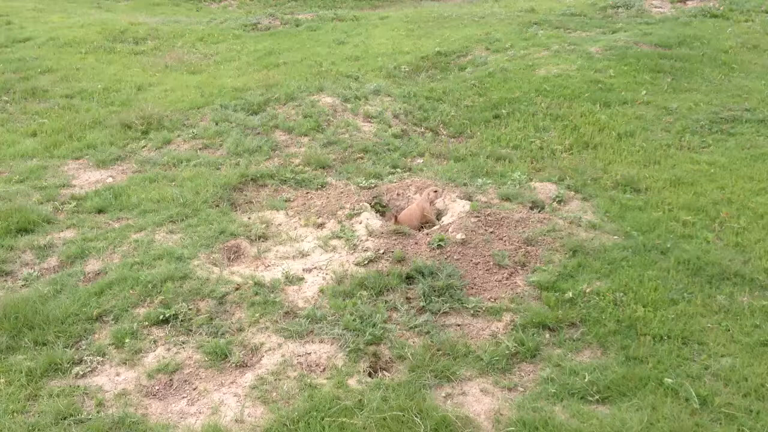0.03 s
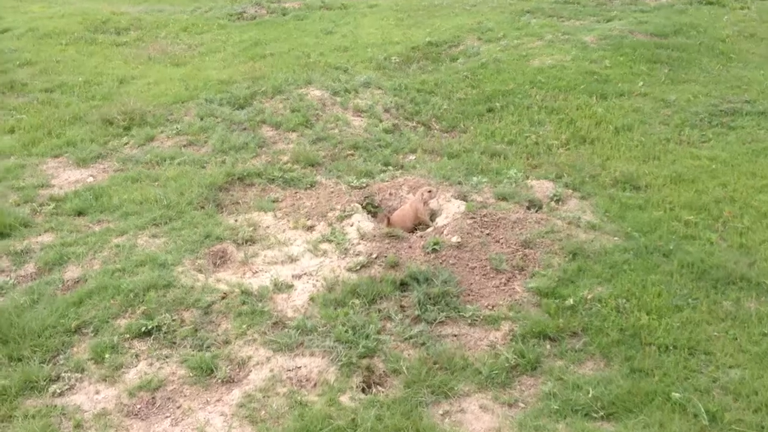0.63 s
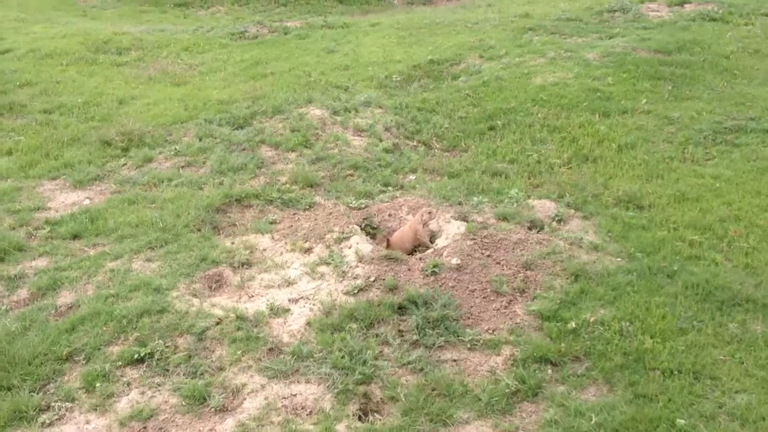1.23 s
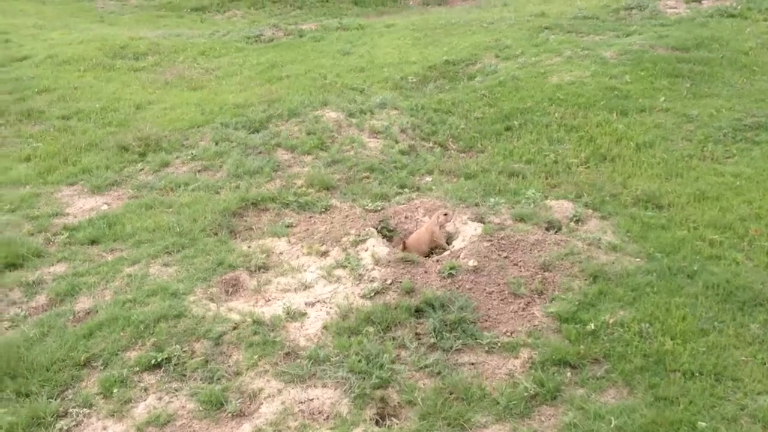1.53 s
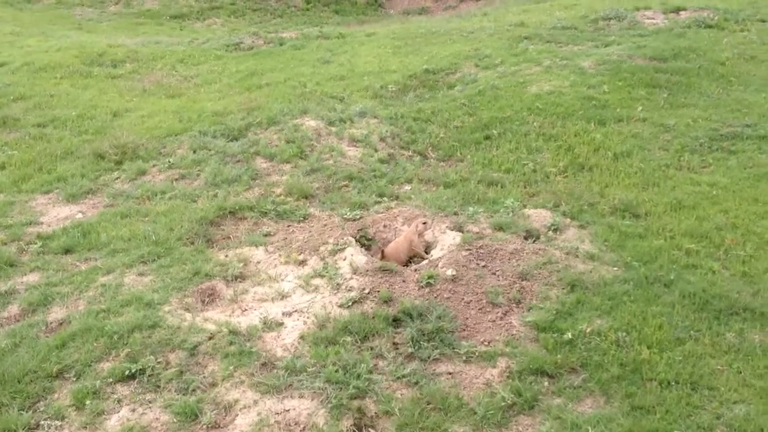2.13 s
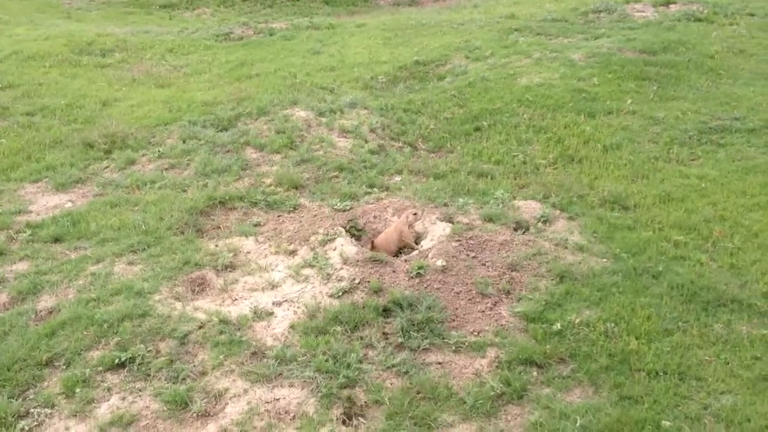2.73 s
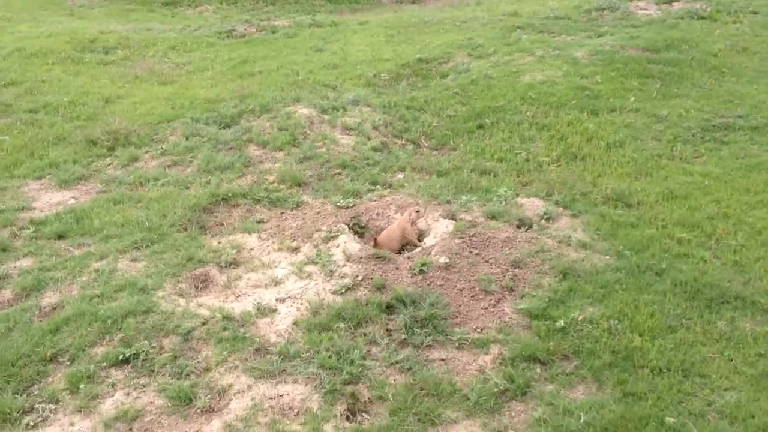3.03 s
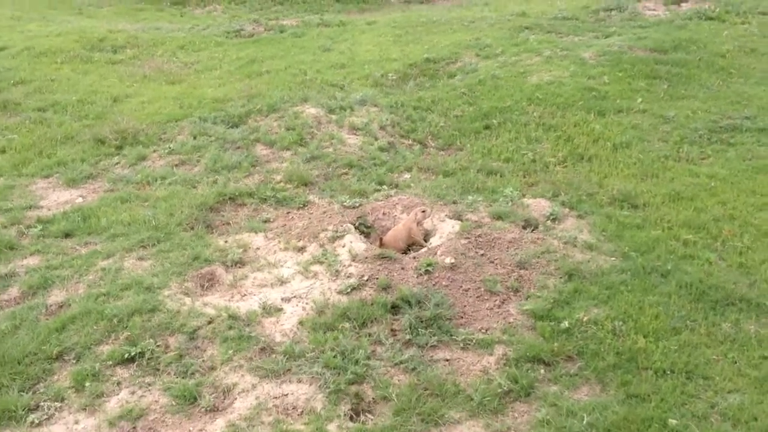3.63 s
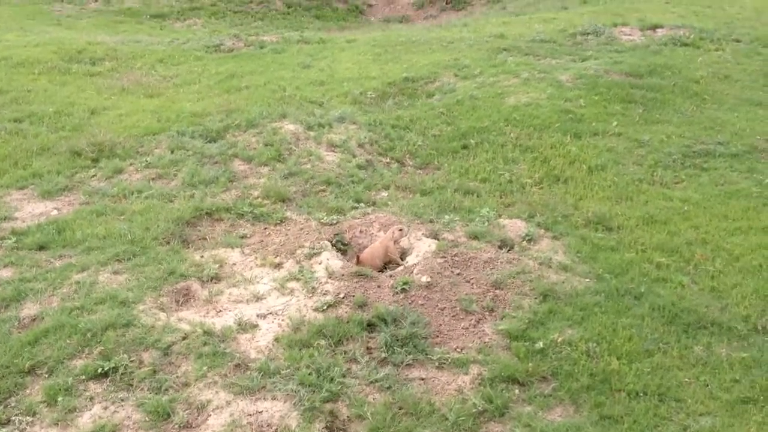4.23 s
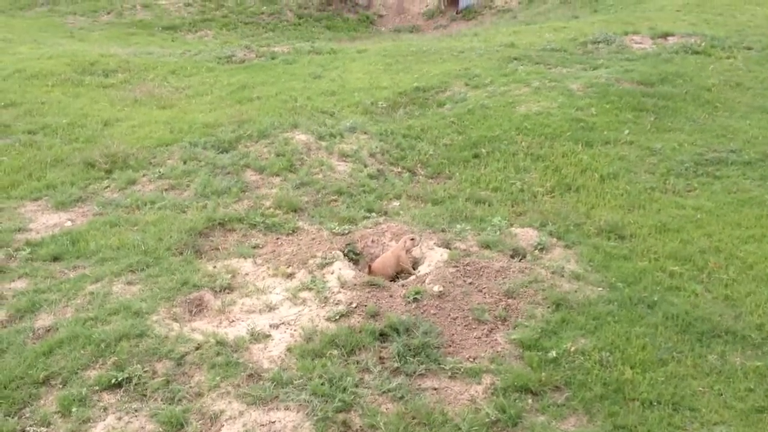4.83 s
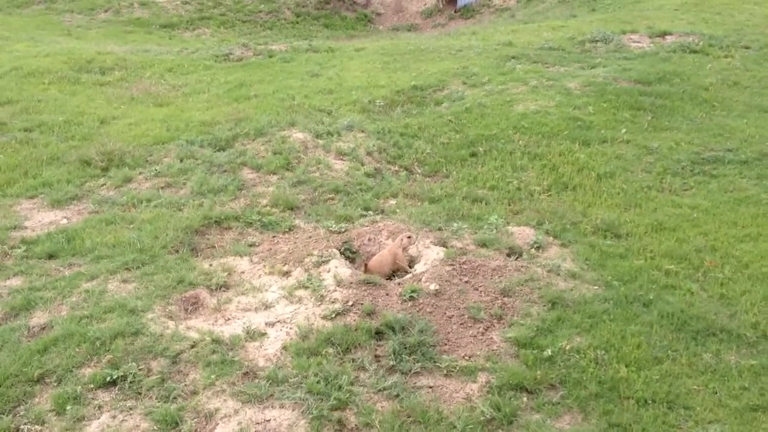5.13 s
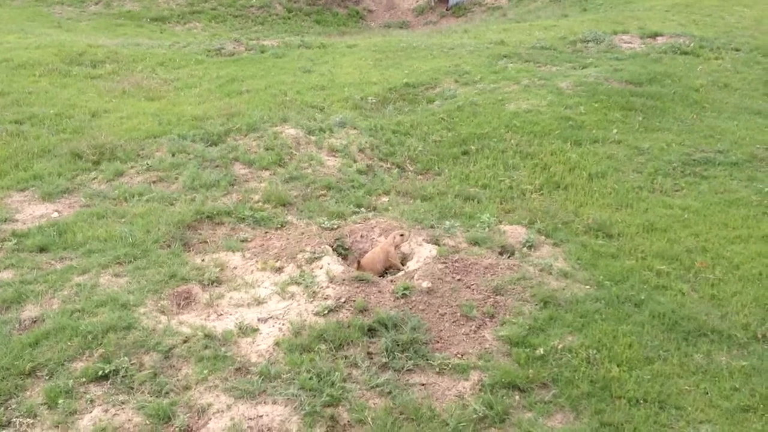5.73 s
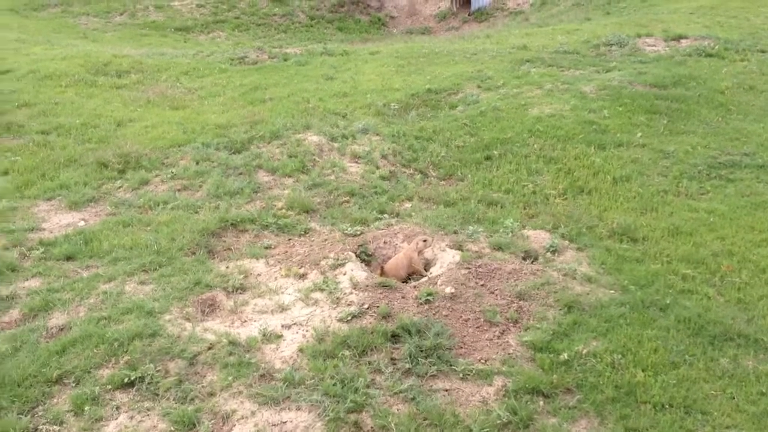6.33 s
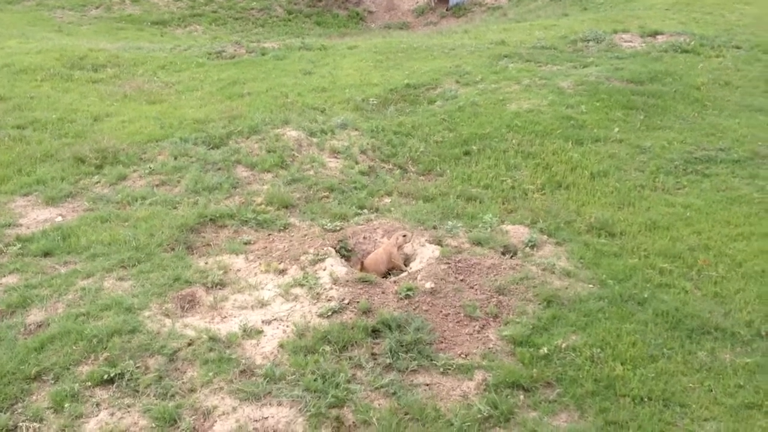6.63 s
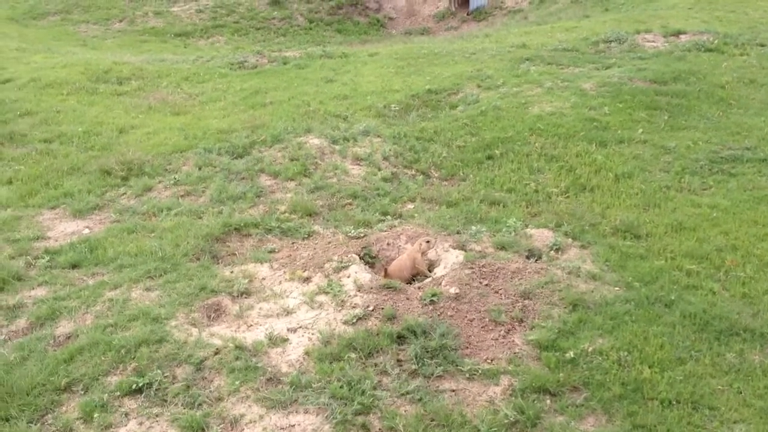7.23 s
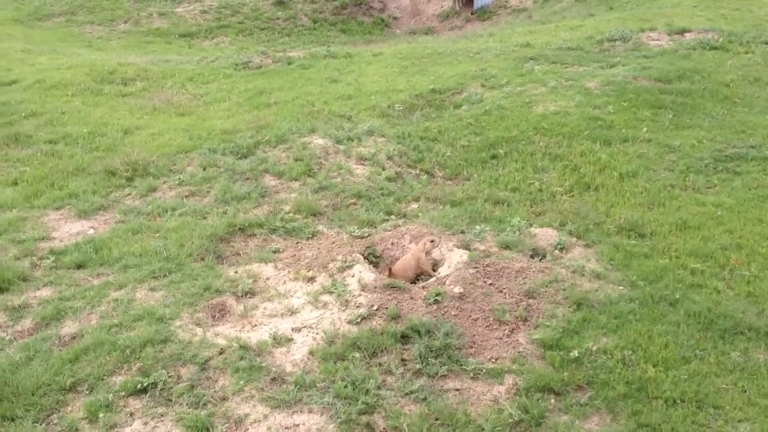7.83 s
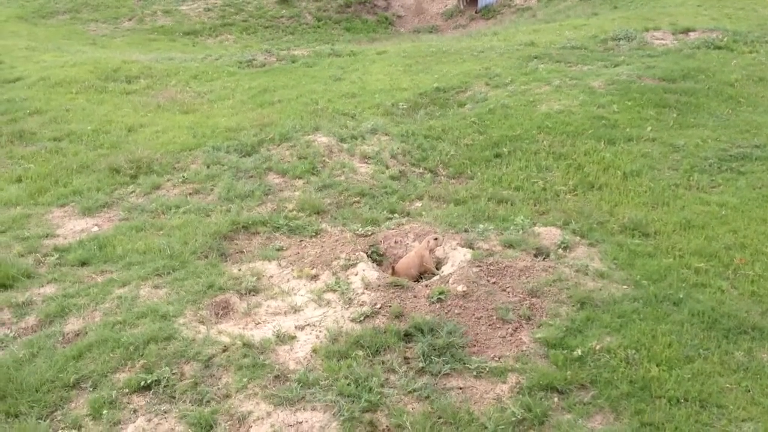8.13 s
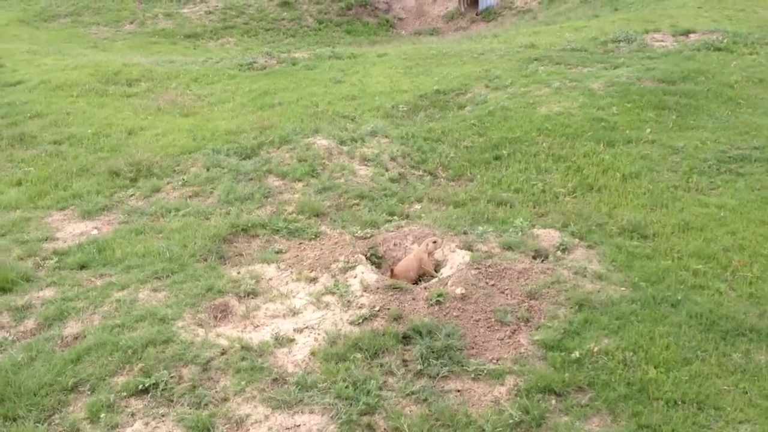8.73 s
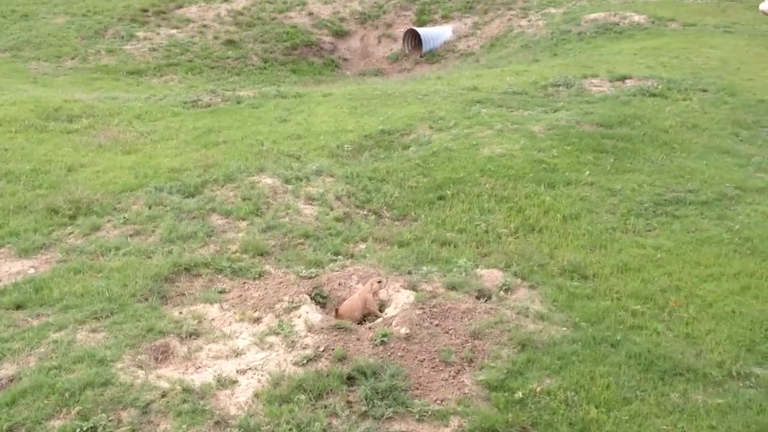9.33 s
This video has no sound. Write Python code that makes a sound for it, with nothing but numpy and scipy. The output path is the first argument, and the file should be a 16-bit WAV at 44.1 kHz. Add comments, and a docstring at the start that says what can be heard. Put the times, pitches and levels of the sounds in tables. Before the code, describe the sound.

Short, shrill prairie dog barks repeat steadily outdoors, with soft gusts, a few microphone handling bumps and far-off traffic.

```python
"""Fingers knock on a hand-held microphone's case, and a prairie dog starts yipping alarms from its burrow.
Each yip is a short fluttering arch of pitch whose harmonics pass through the resonances of the throat;
the hardest ones crack to a lower note halfway. The open grassy slope scatters them and the far bank
returns a faint echo. Gusts rumble on the microphone among soft thumps and tiny ticks, while far traffic
swells and fades behind hissing grass and a few thin whistles."""
import sys
import numpy as np
from scipy import signal
from scipy.fft import rfft, irfft, next_fast_len
from scipy.io import wavfile
from scipy.ndimage import uniform_filter1d, map_coordinates

SR = 44100
rng = np.random.default_rng(int(sys.argv[2]) if len(sys.argv) > 2 else 0)


def bounce(signal):
    """Save signal as a 16-bit WAV file at the path given by the first command-line argument."""
    frames = np.transpose(np.atleast_2d(signal))
    limited = np.clip(frames, -1, 1)
    pcm = np.round(limited * 32767).astype(np.int16)
    wavfile.write(sys.argv[1], SR, pcm)


N = 422919


def amp(db):
    """Amplitude ratio of a level in decibels."""
    return 10 ** (np.asarray(db) / 20)


def unit(x):
    """Normalisation to an rms of 1."""
    return x / np.sqrt(np.mean(x ** 2) + 1e-20)


def along(points, hz):
    """Interpolation of (Hz, value) points on a logarithmic frequency axis."""
    f, v = np.transpose(points)
    return np.interp(np.log(np.abs(hz) + 1), np.log(f + 1), v)


def wobble(rate, size=N):
    """Smooth random modulation: a spline through `rate` knots a second."""
    knots = rng.standard_normal(int(size * rate / SR) + 4)
    return map_coordinates(knots, [np.arange(size) * rate / SR])


def filtered(x, gain):
    """Linear filtering: the spectrum of x is multiplied by gain(Hz)."""
    m = next_fast_len(len(x) + 2048)
    return irfft(rfft(x, m) * gain(np.fft.rfftfreq(m, 1 / SR)), m)[:len(x)]


def noise(spectrum, size=N):
    """Spectral shaping of white noise, at an rms of 1."""
    return unit(filtered(rng.standard_normal(size), lambda hz: amp(along(spectrum, hz))))


def patchy(x, depth_db):
    """Fading in moving air: the gain drifts over time and frequency."""
    spectra = signal.stft(x, nperseg=1024)[2]
    drift = uniform_filter1d(rng.standard_normal(spectra.shape), size=5, axis=0)
    drift = unit(uniform_filter1d(drift, size=18, axis=1))
    return unit(signal.istft(spectra * amp(depth_db * drift), nperseg=1024)[1][:N])


def swells(rows):
    """Incoherent addition: the summed power of bell-shaped swells."""
    t = np.arange(N) / SR
    return sum(amp(db) ** 2 * np.exp(-.5 * ((t - s) / half) ** 2) for s, db, half in rows)


def add(track, s, sound):
    """Superposition of a sound on the track from s seconds on."""
    part = track[max(round(s * SR), 0):][:len(sound)]
    part += sound[:len(part)]


# Spectra of the far roar, traffic and grass. Each row: frequency in Hz, relative density in dB.
ROAR_SPECTRUM = [(100, -35), (190, -1.5), (330, -3), (600, 1), (800, -2.5), (1100, -3), (1450, -8),
                 (1650, -7.5), (2200, -19), (3100, -17.5), (4200, -37)]
RUSH_SPECTRUM = [(300, -21), (550, -2), (850, 4), (1100, 5), (1400, -1), (1700, -5), (2200, -14),
                 (3200, -13.5), (4200, -24.5), (9000, -37)]
GRASS_SPECTRUM = [(1000, 6), (3200, 10), (4500, 3), (5700, 4), (7800, 3), (9600, -8), (12000, -0.5),
                  (15000, 0)]
# Swells of traffic and of grass. Each row: peak time in seconds, level in dB, half width in seconds.
TRAFFIC_PASSES = [(3.05, -54.5, 0.45), (5.6, -58, 0.86), (9.7, -58, 0.74)]
GRASS_RUSTLES = [(.45, -66, .15), (5.2, -69.5, 0.76)]

def traffic_and_grass(roar_db=-55.5, hiss_db=-70.5):
    """Noise powers add: passing traffic lifts a steady roar and brings a brighter rush; grass hisses."""
    passing = swells(TRAFFIC_PASSES)
    roar = np.sqrt(amp(roar_db) ** 2 + passing) * patchy(noise(ROAR_SPECTRUM), depth_db=2.0)
    rush = np.sqrt(passing) * patchy(noise(RUSH_SPECTRUM), depth_db=3.0)
    hiss = np.sqrt(amp(hiss_db) ** 2 + swells(GRASS_RUSTLES)) * noise(GRASS_SPECTRUM)
    return roar + rush + hiss


# Hollow bands of far engine noise. Each row: start in seconds, level in dB, centre in Hz, half width
# in Hz, sag in Hz per second, attack in seconds, hold in seconds, fade in dB per second.
ENGINE_BANDS = [(2.35, -55, 1428, 240, 340, 0.51, .5, 24), (4.056, -49.5, 690.4, 116, 16, .25, 0.53, 6.5),
                (4.6, -56.5, 1100, 107, 45, 0.91, 0.59, 7), (4.9, -58.5, 491, 60, 30, 0.47, .35, 12.5)]

def far_engines():
    """Narrow-band noise: slow random signals modulate a sinking carrier that swells, holds and fades."""
    track = np.zeros(N)
    for s, db, hz, half_width, sag, attack, hold, fade in ENGINE_BANDS:
        t = np.maximum(np.arange(N) / SR - s, 0)
        envelope = np.minimum(t / attack, 1) * amp(db - fade * np.maximum(t - attack - hold, 0))
        band = lambda: filtered(rng.standard_normal(N), lambda f: 1 / (1 + (f / half_width) ** 4))
        phase = 2 * np.pi * np.cumsum(hz - sag * t) / SR
        track += envelope * unit(band() * np.cos(phase) + band() * np.sin(phase))
    return track


# Faint notes. Each row: start in seconds, level in dB, first and last pitch in Hz, length in seconds.
FAR_WHISTLES = [(.43, -54.5, 1520, 1434, 0.1), (.47, -57, 1790, 1700, 0.084), (8.82, -64, 1840, 1800, .08)]

def whistles():
    """Pure tones in a linear downward glide, perhaps a bird far away."""
    track = np.zeros(N)
    for s, db, start_hz, end_hz, length in FAR_WHISTLES:
        hz = np.linspace(start_hz, end_hz, int(length * SR))
        add(track, s, amp(db) * np.hanning(len(hz)) * np.sin(2 * np.pi * np.cumsum(hz) / SR))
    return track


# Spectra of wind rumble and of its largest eddies. Each row: frequency in Hz, relative density in dB.
RUMBLE_SPECTRUM = [(20, -44), (40, -32), (70, -19.5), (110, -5), (160, 0), (230, -3.5), (330, -13),
                   (600, -31), (1500, -72)]
EDDY_SPECTRUM = [(20, -34), (45, -20), (80, -2), (120, 1.5), (200, -17), (400, -63)]
# Gusts. Each row: peak time in seconds, strength in dB, half width in seconds.
WIND_GUSTS = [(2.1, -55, .33), (2.58, -50, .06), (3.3, -54, 0.26), (3.97, -46.5, 0.021),
              (4.14, -48.5, 0.066), (4.52, -47.5, 0.11), (4.76, -49, 0.06), (5.35, -53, 0.2),
              (6.6, -59.5, 0.32), (9.4, -48.5, 0.17)]

def wind(breeze_db=-60, strong_gust_db=-51, deepening=0.94):
    """Turbulence: eddies buffet the microphone in quick lumps; stronger gusts bring larger, deeper ones."""
    buffet_db = 10 * np.log10(amp(breeze_db) ** 2 + swells(WIND_GUSTS))
    body = amp(1.0) * unit(amp(2.5 * wobble(16)) * noise(RUMBLE_SPECTRUM))
    deep_db = -6 + deepening * np.minimum(buffet_db - strong_gust_db, 0)
    deep = amp(deep_db) * unit(amp(5.0 * wobble(11)) * noise(EDDY_SPECTRUM))
    return amp(buffet_db) * (body + deep)


# Bumps. Each row: peak time in seconds, level in dB, frequency in Hz, half length in seconds.
MICROPHONE_BUMPS = [(2.185, -39, 145, 0.0051), (2.915, -34, 151, 0.0035), (3.249, -26, 198, 0.002),
                    (4.548, -30, 225, 0.0029), (6.693, -52, 89, 0.01), (6.86, -38.5, 120.7, 0.0033),
                    (9.243, -33.5, 206, 0.0042), (9.288, -39, 165, 0.0065), (9.38, -36, 163, 0.0067),
                    (9.409, -29.5, 169, 0.0044)]

def thumps():
    """Transient oscillation: soft bumps push the microphone to and fro for a few cycles."""
    track, t = np.zeros(N), np.arange(-SR // 8, SR // 8) / SR
    for s, db, hz, half in MICROPHONE_BUMPS:
        add(track, s + t[0], amp(db) / np.cosh(t / half) * np.cos(2 * np.pi * hz * t))
    return track


# Tiny dry ticks. Each row: start in seconds, relative level in dB.
DRY_TICKS = [(2.172, -49), (6.1724, -54), (6.4443, -53)]
# Their spectrum. Each row: frequency in Hz, relative density in dB.
TICK_SPECTRUM = [(2000, -20), (5000, 3), (8000, 2), (14000, -12)]

def ticks(gain_db=-7, t60=0.021):
    """Exponential decay of bright noise bursts, perhaps grass stems underfoot."""
    track, t = np.zeros(N), np.arange(SR // 20) / SR
    for s, db in DRY_TICKS:
        add(track, s, amp(db + gain_db - 60 * t / t60) * noise(TICK_SPECTRUM, size=len(t)))
    return track


# Modes of the case under a soft finger, and those that only a sharp snap reaches.
# Each row: frequency in Hz, relative level in dB, time to decay by 60 dB in seconds.
KNOCK_MODES = [(357, -19.5, 0.018), (636, -14, 0.021), (765, 1.5, 0.0088), (1270, 7.5, 0.0036)]
SNAP_MODES = [(1800, -20, 0.02), (2240, 0.5, 0.005), (2830, -0.5, 0.004), (5400, -4, 0.0016),
              (6860, -15, 0.0078)]
# Taps. Each row: start in seconds, gain in dB, further gain of the snap in dB.
FINGER_TAPS = [(.1320, -14.5, -10.5), (0.2381, -26.5, -13.5), (0.3386, -18, -2), (1.3881, -16, 5),
               (3.1309, -25, -20), (5.089, -30, -14)]

def finger_taps(band_hz=(330, 7000), contact_s=0.00041):
    """Damped modal vibration: fingers briefly ring a case too small to radiate bass."""
    track, t = np.zeros(N), np.arange(SR // 16) / SR
    ring = lambda modes: sum(amp(db - 60 * t / t60) * np.sin(2 * np.pi * hz * t) for hz, db, t60 in modes)
    # the soft fingertip takes a moment to press home, which keeps the knock dull
    knock = ring(KNOCK_MODES) * (1 - np.exp(-t / contact_s))
    for s, db, snap_db in FINGER_TAPS:
        add(track, s, amp(db) * (knock + amp(snap_db) * ring(SNAP_MODES)))
    return signal.sosfilt(signal.butter(3, band_hz, "bandpass", fs=SR, output="sos"), track)


def slope_echo(x, ground_t60=0.076, bank_delay_s=0.0666, bank_spread_s=0.0047, tail_t60=0.56):
    """Convolution adds scatter from the ground, a blurred echo from the far bank and a thin tail."""
    t = np.arange(SR // 3) / SR
    ground = amp(-60 * t / ground_t60)
    bank = np.exp(-.5 * ((t - bank_delay_s) / bank_spread_s) ** 2)
    tail = amp(-60 * t / tail_t60)
    paths = [(-18, ground), (-31.5, bank), (-36, tail)]  # dB relative to the direct sound
    scatter = sum(amp(db) * unit(shape * rng.standard_normal(len(t))) for db, shape in paths)
    return signal.fftconvolve(x, (t == 0) + scatter / np.sqrt(len(t)))


# Bands that the burrow mound cancels or reinforces. Each row: centre in Hz, half width in Hz, gain in dB.
MOUND_BANDS = [(1830, 63, -16.5), (2000, 57, 10.5), (2350, 120, -0.5), (3150, 64, -18), (3230, 210, 2.5),
               (3655, 165, -8.5), (3990, 110, -18), (4700, 90, -16), (5107, 130, -25), (5800, 88, -12.5),
               (6680, 89, -15)]

def mound(x):
    """Interference: reflections around the burrow mouth put narrow dips and peaks into the voice."""
    for hz, half_width, db in MOUND_BANDS:
        band = signal.lfilter(*signal.iirpeak(hz, hz / (2 * half_width), fs=SR), x)
        x = x - (1 - amp(db)) * band
    return x


# The course of one yip. Each row: time as a share of its length, pitch as a share of its nominal pitch,
# effort in dB, relative flutter depth.
YIP_COURSE = [(0, .8, -11.5, 0.4), (0.101, .86, -0.5, 1.14), (0.201, .94, 4.5, 1.07), (.4, 0.97, 8, 0.68),
              (.6, 0.93, 5, 0.87), (.78, .91, 3, 0.56), (0.92, .78, -5, 0.3), (1.06, .65, -19, 0.7)]
# Tone colour of the yip as heard: throat resonances, with a gap near 9.9 kHz that is not the animal's.
# Each row: frequency in Hz, gain in dB.
YIP_COLOUR = [(1150, 2.5), (1650, -16.5), (2000, -10.5), (2400, -11), (3000, -7.5), (3350, -1),
              (3800, -5.5), (4700, -26), (5500, -10), (6100, -8), (7250, -9.5), (8100, -14), (9000, -22),
              (9900, -48), (11000, -31.5), (12400, -39), (14000, -27), (15200, -50)]
# Breathy rasp of the yip as heard, with a gap near 9.9 kHz that is not the animal's.
# Each row: frequency in Hz, relative density in dB.
RASP_SPECTRUM = [(600, -28.5), (1300, -12.5), (1900, 2.5), (2450, -35), (3400, 11), (4300, -2), (4700, -13),
                 (5600, -0.5), (7200, 2), (9000, -6.5), (9900, -37), (11000, -11), (14000, -41),
                 (15200, -45)]
USUAL_DB, USUAL_HZ = -29, 1810  # an ordinary yip

def yip(nominal_hz, length, drop, tilt_db, rasp_db, flutter_hz=212, flutter_share=.026, flutter_db=3.2):
    """Source and filter: harmonics of an arching pitch sweep through a fixed spectral envelope."""
    t = np.arange(SR // 10) / SR
    n, progress = len(t), t / length
    share, *course = np.transpose(YIP_COURSE)
    arch, effort_db, shake = (np.interp(progress, share, column) for column in course)
    shake = shake * (nominal_hz / USUAL_HZ) ** 3  # higher yips are more strained and shake harder
    # a second, far slower vibration starts with the voice and modulates both pitch and loudness
    flutter_rate = flutter_hz * (1 + 0.093 * wobble(122, size=n))
    flutter = -shake * np.cos(2 * np.pi * np.cumsum(flutter_rate) / SR)
    # a crack drops to a lower, weaker note that moves back toward the arch as the strain eases
    cracked = .5 + .5 * np.tanh((progress - .53) * 45)
    pitch = arch * (1 - drop * cracked * arch ** 3)
    jitter = 0.014 * shake * wobble(1519, size=n)
    hz = nominal_hz * pitch * (1 + flutter_share * flutter + jitter)
    phase = 2 * np.pi * np.cumsum(hz) / SR

    def partial(k):
        """The component at k times the fundamental, tilted by tilt_db per octave."""
        gain = amp(along(YIP_COLOUR, k * hz) + tilt_db * np.log2(k)) * (k * hz < SR / 2)
        return gain * np.sin(k * phase + 2 * np.pi * rng.random())

    # uneven cycles put smeared lines halfway between the harmonics
    voice = sum(partial(k) + amp(-20) * wobble(670, size=n) * partial(k + .5) for k in range(1, 11))
    rasp = amp(rasp_db) * noise(RASP_SPECTRUM, size=n)
    effort = amp(effort_db + flutter_db * flutter - 170 * drop ** 2 * cracked)
    gate = (1 - np.exp(-t / 0.00019)) * amp(-120 * np.maximum(progress - share[-1], 0))
    sound = mound((voice + rasp) * effort * gate)
    loud_part = sound[(t > .009) & (t < .039)]
    return sound / np.sqrt(np.mean(loud_part ** 2))


# Alarm calls. Each row: start in seconds, level in dB, nominal pitch in Hz (near the top of the arch),
# length in seconds, depth of the crack from 0 to 1.
ALARM_YIPS = [(0.286, -32, 1788, .058, 0.06), (.707, -29, 1832, .053, 0.02), (1.084, -29, 1881, .049, 0),
              (1.59, -29, 1882, 0.051, 0.02), (2.051, -29, 1958, 0.055, 0.22),
              (2.568, -29, 1970, 0.054, 0.21), (3.185, -29, 1904, 0.052, 0.01),
              (3.915, -27.5, 1982, 0.052, .07), (4.313, -30, 1945, 0.055, 0.19),
              (4.727, -29.5, 1820, .054, 0.01), (5.158, -30.5, 1727, 0.058, 0.02),
              (5.55, -29, 1799, 0.05, 0.02), (6.017, -28.5, 1750, .052, 0), (6.579, -30, 1747, 0.052, 0.01),
              (7.131, -32.5, 1704, 0.051, 0.01), (7.653, -28.5, 1788, .054, 0),
              (8.127, -29, 1854, 0.055, 0.02), (8.613, -28.5, 1805, .052, 0),
              (9.151, -29, 1855, .055, 0.04)]

def prairie_dog():
    """Vocal effort sets timbre: louder yips are brighter, higher ones raspier; each scatters its own way."""
    track = np.zeros(N)
    for s, db, hz, length, drop in ALARM_YIPS:
        tilt_db = 0.76 + 0.47 * (db - USUAL_DB)
        rasp_db = -12 + 18 * np.log2(hz / USUAL_HZ)
        add(track, s, amp(db) * slope_echo(yip(hz, length, drop, tilt_db, rasp_db)))
    return track


def scene():
    """Superposition: the pressures of all sources add at one microphone."""
    far = traffic_and_grass() + far_engines() + whistles()
    return (far + prairie_dog() + finger_taps() + ticks() + thumps() + wind())[None]


def record(dry, open_s=.12, limit_hz=15400):
    """Gating and band limiting: the microphone opens after a moment and passes nothing above its limit."""
    opened = np.arange(N) / SR >= open_s
    return filtered(dry[0] * opened, lambda hz: hz < limit_hz)[None]


dry = scene()
out = record(dry)
bounce(out)
```